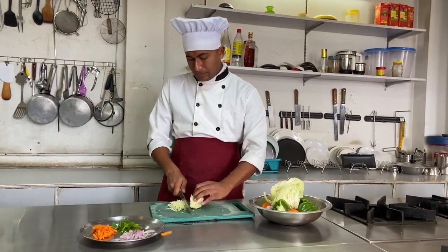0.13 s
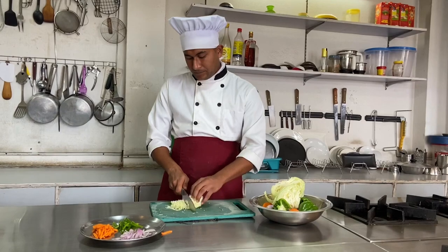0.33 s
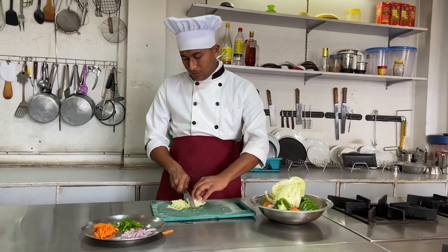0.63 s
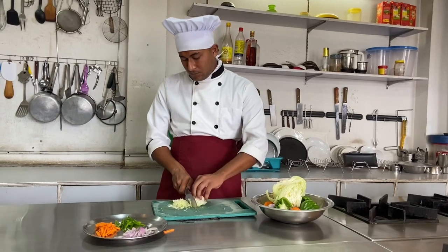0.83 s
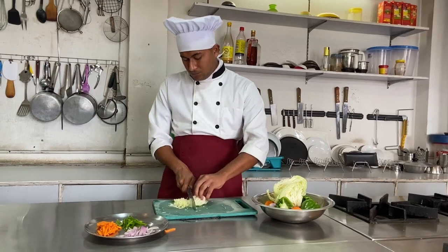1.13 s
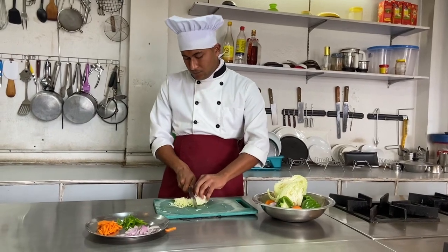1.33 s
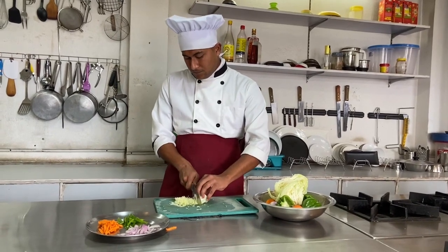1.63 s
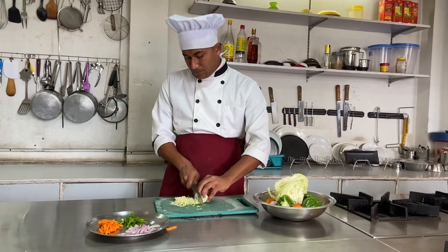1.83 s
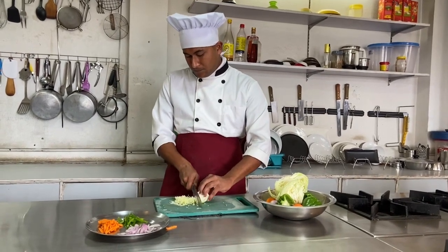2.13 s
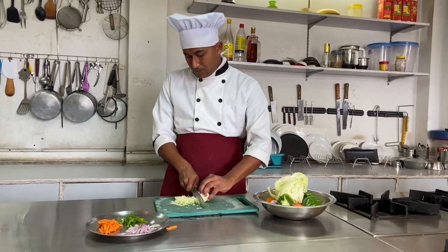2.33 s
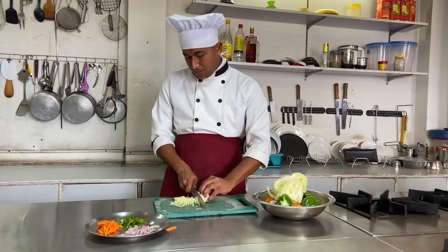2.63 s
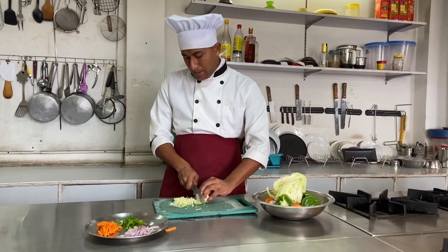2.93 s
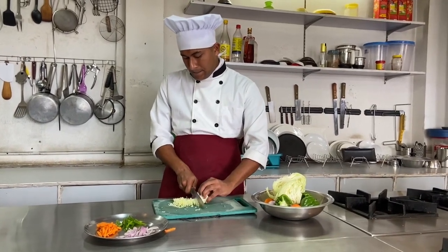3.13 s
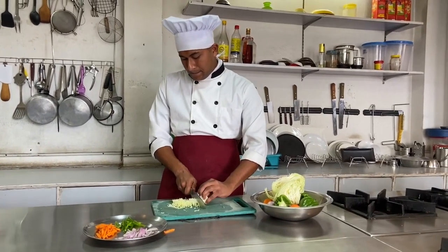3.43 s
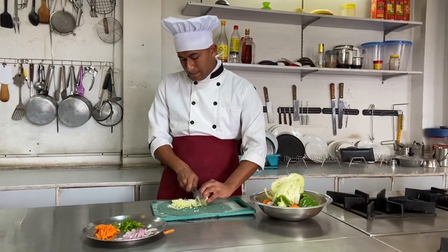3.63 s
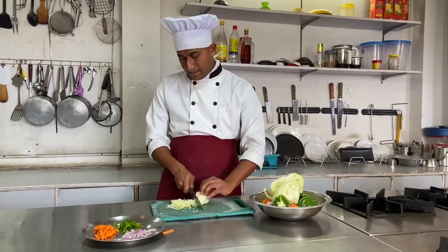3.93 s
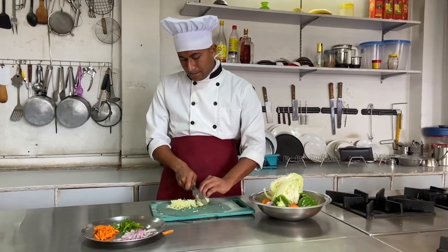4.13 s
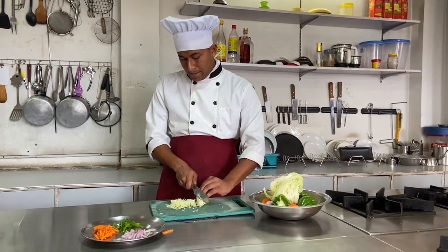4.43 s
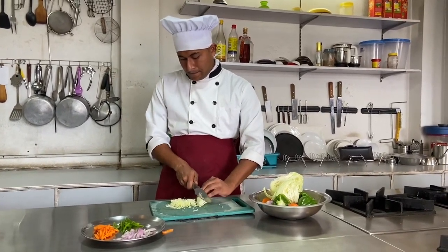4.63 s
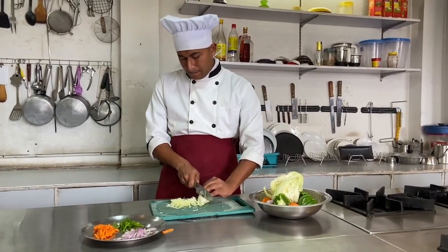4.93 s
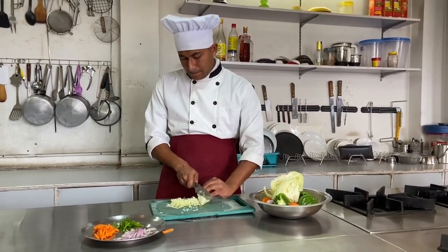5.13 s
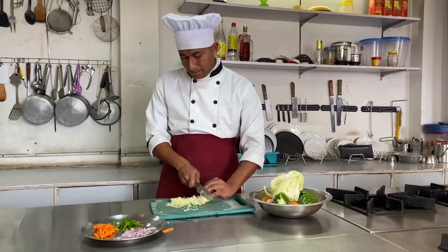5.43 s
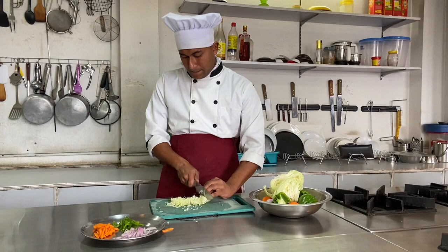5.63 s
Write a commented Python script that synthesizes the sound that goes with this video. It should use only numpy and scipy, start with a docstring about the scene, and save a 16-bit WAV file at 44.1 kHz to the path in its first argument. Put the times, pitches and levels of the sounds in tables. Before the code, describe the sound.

A low ventilation rumble with very faint hiss fills a hard, reflective kitchen. At the start the echo of an earlier knock dies away while a thin, fluttering squeak sounds until about 0.4 s, followed by a barely audible sagging whistle until 1.1 s. A soft, dull bump comes at 1.1 s. From 1.34 to 3.7 s a knife chops cabbage in a slightly uneven run, about every 0.2 to 0.3 s: each stroke swells with a crisp crackling crunch, then knocks short and hard on a plastic board, with an edge click, bright room echo and faint steel counter ring. The stroke near 1.94 s only crunches. The strongest blows overload the close microphone. Leaves rustle faintly in the pause, with a tiny blade tap at 4.2 s. Softer chops resume at 4.76 and 5.07 s, strengthening at 5.32 and 5.55 s; a final weak crunch at 5.8 s lacks a knock.

```python
"""The echo of an earlier knock dies away over the room's rumble while something squeaks faintly, then whistles.
A chef's knife then chops cabbage on a plastic board on a steel counter in a hard-walled kitchen.
Each stroke crunches (bursts of filtered clicks); most then knock on the board (decaying modes, crack, edge click).
Shreds rustle between strokes (sparse clicks and noise); the hardest knocks overload the microphone."""
import sys
import numpy as np
from scipy import signal
from scipy.fft import rfft, irfft, next_fast_len
from scipy.io import wavfile
from scipy.ndimage import map_coordinates

SR = 44100
rng = np.random.default_rng(int(sys.argv[2]) if len(sys.argv) > 2 else 0)


def pcm_store(signal):
    """Save signal as 16-bit PCM."""
    levels = np.round(np.clip(np.atleast_2d(signal), -1, 1) * 32767)
    wavfile.write(sys.argv[1], SR, levels.astype(np.int16).T)


N = 254898


def amp(db):
    """Decibels to gain."""
    return 10 ** (np.asarray(db) / 20)


def unit(x):
    """Scale to rms 1."""
    return x / np.sqrt(np.mean(x ** 2) + 1e-20)


def wobble(size, rate_hz):
    """A smooth random curve with rate_hz knots a second."""
    knots = rng.standard_normal(int(size * rate_hz / SR) + 4)
    return map_coordinates(knots, [np.arange(size) * rate_hz / SR])


def along(points, hz):
    """(Hz, value) points read on a log frequency axis."""
    point_hz, value = np.transpose(points)
    return np.interp(np.log(hz + 1), np.log(point_hz + 1), value)


def filtered(x, response):
    """x times a response of frequency, zero-padded against wrap-around."""
    size = next_fast_len(len(x) + 8192)
    hz = np.fft.rfftfreq(size, 1 / SR)
    return irfft(rfft(x, size) * response(hz), size)[:len(x)]


def coloured(x, spectrum):
    """x shaped by (Hz, dB) points."""
    return filtered(x, lambda hz: amp(along(spectrum, hz)))


def add(track, start_s, x):
    """Mix x into the track from start_s on, cropped to the track."""
    i = round(start_s * SR)
    x = x[max(-i, 0):max(N - i, 0)]
    track[max(i, 0):][:len(x)] += x


def grains(size, per_s, spread_db):
    """Random clicks of uneven strength, rms about 1."""
    hit = rng.random(size) < per_s / SR
    strength = rng.standard_normal(size) * amp(spread_db * rng.standard_normal(size))
    return unit(hit * strength)


# Echo colour. Each row: frequency in Hz, gain in dB.
ECHO_SPECTRUM = [(60, -12), (220, 7.5), (450, 1), (800, -7.5), (1150, -2.5), (1500, -1), (2400, 2),
                 (3400, -3.5), (4200, -6), (8000, -7), (16000, -8.5)]
# Echo decay. Each row: frequency in Hz, time to fall 60 dB in seconds.
ECHO_T60 = [(100, 1), (300, 0.78), (800, 0.74), (2000, 0.61), (3500, 0.46), (6000, 0.77), (14000, 0.45)]


def in_kitchen(x, wet_db, build_s=0.0059, early_db=3, early_s=0.021):
    """x with a diffuse noise tail that is strongest while the close walls answer."""
    hz, frame_s, noise = signal.stft(rng.standard_normal(SR), SR, nperseg=256)
    decay = amp(-60 * frame_s / along(ECHO_T60, hz)[:, None])
    tail = signal.istft(noise * decay, SR, nperseg=256)[1][:SR]
    tail = coloured(tail / np.linalg.norm(tail), ECHO_SPECTRUM)
    t = np.arange(SR) / SR
    tail *= (1 - np.exp(-(t / build_s) ** 2)) * amp(early_db * np.exp(-t / early_s))
    return np.pad(x, (0, SR - 1)) + amp(wet_db) * signal.fftconvolve(x, tail)


# Ventilation rumble. Each row: frequency in Hz, relative density in dB per Hz.
RUMBLE_SPECTRUM = [(20, -0.5), (40, -11.5), (60, -9.5), (90, -12.5), (125, -21), (220, -23.5), (350, -30.5),
                   (800, -29.5), (1500, -36.5), (2300, -43), (3500, -49), (4000, -59.5), (8000, -65),
                   (16000, -70)]


def room_air(rumble_db=-39.5, hiss_db=-72):
    """Ventilation rumble with a faint narrow hiss on top, both shaped noise."""
    rumble = unit(coloured(rng.standard_normal(N), RUMBLE_SPECTRUM))
    hiss_spectrum = [(2400, -60), (3250, -10), (3460, 0), (3620, -10), (4100, -60)]
    hiss = unit(coloured(rng.standard_normal(N), hiss_spectrum))
    return amp(rumble_db) * rumble + amp(hiss_db) * hiss


# Squeak partials. Each row: multiple of the pitch, relative level in dB.
PARTIALS = [(7, -9), (8, -1.5), (9, -4), (10, 0.5), (11, -13), (12, -15), (23, -17), (24, -21)]


def squeak(jitter=0.0069, flutter_db=3, width_hz=460, skirt_db=-12):
    """A thin squeal: partials flutter separately under a falling resonance, mostly heard through the room."""
    pitch_hz, arch_hz, ring_start_hz, ring_fall_hz_per_s = 351, 2.98, 3380, 530
    attack_s, hold_s, release_s = 0.028, 0.404, 0.014
    level_db, fade_db_per_s = -50.5, 11.5
    t = np.arange(N) / SR
    pitch = pitch_hz + arch_hz * np.sin(np.pi * np.minimum(t / hold_s, 1))
    ring_hz = ring_start_hz - ring_fall_hz_per_s * t
    gate = (1 - np.exp(-t / attack_s)) * np.exp(-np.maximum(t - hold_s, 0) / release_s)
    phase = 2 * np.pi * np.cumsum(pitch * (1 + jitter * wobble(N, rate_hz=90))) / SR
    tone = np.zeros(N)
    for multiple, partial_db in PARTIALS:
        resonance = amp(skirt_db) + np.exp(-((multiple * pitch - ring_hz) / width_hz) ** 2)
        flutter = amp(partial_db + flutter_db * wobble(N, rate_hz=18.6))
        tone += resonance * flutter * np.sin(multiple * phase)
    return in_kitchen(tone * amp(level_db - fade_db_per_s * t) * gate, wet_db=5)[:N]


def whistle(start_s=0.45, end_s=1.1, start_hz=3440, sag_hz_per_s=110, level_db=-70.5, jitter=0.0049):
    """One faint wavering sine that lingers after the squeak and sags in pitch."""
    t = np.arange(round((end_s - start_s) * SR)) / SR
    pitch = (start_hz - sag_hz_per_s * t) * (1 + jitter * wobble(len(t), rate_hz=90))
    tone = np.sin(2 * np.pi * np.cumsum(pitch) / SR) * signal.windows.tukey(len(t))
    track = np.zeros(N)
    add(track, start_s, in_kitchen(amp(level_db) * tone, wet_db=5.5))
    return track


# Single shreds snap. Each row: start in seconds, level in dB.
SNAPS = [(.441, -53), (.958, -60), (1.263, -57), (1.828, -56), (2.2145, -55), (5.228, -59), (5.659, -58)]
# Fingers shift the cabbage. Each row: centre in seconds, length in seconds, level in dB.
FINGER_MOVES = [(.13, 0.215, -63), (1.29, .038, -59), (2.842, .14, -62.5), (3.873, 0.078, -63),
                (4.46, .089, -70), (5.702, .055, -54.5)]


def shreds(tap_s=4.199, tap_db=-34, tap_hz=2900, tap_t60_s=0.0057, snap_t60_s=0.013, stray_db=-87, hold_db=-84):
    """Loose leaves rustle as grains under the fingers, single ones snap as noise, the blade is tapped once."""
    track = np.zeros(N)
    t = np.arange(SR // 40) / SR
    for start_s, db in SNAPS:
        add(track, start_s, amp(db - 60 * t / snap_t60_s) * rng.standard_normal(len(t)))
    add(track, tap_s, amp(tap_db - 60 * t / tap_t60_s) * np.sin(2 * np.pi * tap_hz * t))
    snap = amp(-60 * t / snap_t60_s) * rng.standard_normal(len(t))
    stray = signal.fftconvolve(grains(N, per_s=9, spread_db=1), snap)[:N]
    track += amp(stray_db) * unit(stray)
    t = np.arange(N) / SR
    # the leaves never lie quite still under the hand
    touch = amp(hold_db)
    for centre_s, length_s, db in FINGER_MOVES:
        touch = touch + amp(db) * np.exp(-(2 * (t - centre_s) / length_s) ** 2)
    rustle_spectrum = [(500, -6), (3000, 12.5), (4500, -2), (11000, -9), (16000, -14)]
    track += touch * unit(coloured(grains(N, per_s=3100, spread_db=4), rustle_spectrum))
    return in_kitchen(track, wet_db=-3)[:N]


# Cabbage and hand bump the board. Each row: start in seconds, level in dB.
SOFT_BUMPS = [(-.02, -28.5), (1.1048, -27), (1.14, -37), (1.174, -44.5), (1.251, -45)]
# Bump shudder. Each row: frequency in Hz, relative density in dB per Hz.
SHUDDER_SPECTRUM = [(40, -6), (130, -5), (280, -5.5), (480, 3), (800, 3.5), (1300, -11.5), (3000, -19.5),
                    (5000, -44)]


def bumping(t60_s=0.083, shove_db=4, shudder_db=-2.5):
    """Soft contacts give one dull shove and a low noise shudder with no ring."""
    track = np.zeros(N)
    t = np.arange(SR // 8) / SR
    u = t / 0.00043
    shove = -amp(shove_db) * u * (2 - u) * np.exp(1 - u)
    envelope = (1 - np.exp(-t / 0.00048)) * amp(shudder_db - 60 * t / t60_s)
    for start_s, db in SOFT_BUMPS:
        shudder = unit(coloured(rng.standard_normal(len(t)), SHUDDER_SPECTRUM)) * envelope
        add(track, start_s, in_kitchen(amp(db) * (shove + shudder), wet_db=0.5))
    return track


# Knife strokes, also played by chopping(). Each row: time the blade is down in seconds,
# length of the cut in seconds, force in dB, crunch level at the end of the cut in dB.
KNIFE_STROKES = [(1.104, 0.0529, -43, -53), (1.3434, .036, -7, -46), (1.5425, .052, -8, -44.5),
                 (1.7361, 0.0426, -1.1, -43.5), (1.944, 0.0519, -24, -49.5), (2.1004, 0.0191, -1.5, -49.5),
                 (2.3931, 0.044, 1.5, -43), (2.6713, 0.048, -2, -45), (2.8941, 0.017, 2.5, -48.5),
                 (3.1902, 0.07, -3, -49), (3.4665, 0.065, -4.5, -49), (3.707, .052, 1.5, -51.5),
                 (4.7579, 0.06, -11, -47.5), (5.0699, .066, -12.5, -46.5), (5.3179, 0.054, -8, -46.5),
                 (5.5497, .042, -2.5, -44.5), (5.793, 0.0432, -30, -53.5)]
# Bursting cells. Each row: frequency in Hz, relative density in dB per Hz.
CRACKLE_SPECTRUM = [(300, -19), (1200, -9), (2800, 14), (3500, 8.5), (4200, 0.5), (6000, -2), (9500, -5),
                    (14000, -12.5), (16000, -30)]
# Shaken board. Each row: frequency in Hz, relative density in dB per Hz.
GRUMBLE_SPECTRUM = [(60, -1.5), (200, -2.5), (450, 1.5), (750, 4.5), (1050, -2), (1400, -6), (2200, -10),
                    (3400, -17), (4500, -42)]


def slicing(push_db=3, release_s=0.014, layers_db=2, bite_s=0.0026):
    """Cells burst harder as the blade sinks in, leaf after leaf; the growing push shakes the board."""
    # at a force of 0 dB, then growth per dB of force
    swell_db, swell_db_per_db = 16, 0.41
    grumble_over_crunch_db, grumble_db_per_db = 13.5, 0.097
    track = np.zeros(N)
    for down_s, cut_s, force_db, crunch_db in KNIFE_STROKES:
        t = np.arange(round((cut_s + 0.12) * SR)) / SR
        uncut = np.maximum(1 - t / cut_s, 0)
        level_db = crunch_db - (swell_db + swell_db_per_db * force_db) * uncut
        gate = (1 - np.exp(-t / bite_s)) * np.exp(-np.maximum(t - cut_s, 0) / release_s)
        crackle = unit(coloured(grains(len(t), per_s=5000, spread_db=4), CRACKLE_SPECTRUM))
        grumble = unit(coloured(grains(len(t), per_s=6000, spread_db=0), GRUMBLE_SPECTRUM))
        crackle *= amp(level_db + layers_db * wobble(len(t), rate_hz=81))
        grumble_db = level_db + grumble_over_crunch_db + grumble_db_per_db * force_db
        grumble *= amp(grumble_db - push_db * uncut)
        add(track, down_s - cut_s, in_kitchen(gate * (crackle + grumble), wet_db=-1.5))
    return track


# Damped board under the blade. Each row: frequency in Hz, relative level in dB, time to fall 60 dB in seconds.
BOARD_MODES = [(189, -39.5, 0.0067), (670, -10, 0.0067), (798.4, 8, 0.0075), (1014, -12.5, 0.0097),
               (1860, -19, 0.011)]
# Steel counter. Each row: mean frequency in Hz, mean relative level in dB, time to fall 60 dB in seconds.
COUNTER_MODES = [(85.74, -36, 1), (184.3, -35, 1), (256.4, -35.5, 0.63), (338, -40, 0.23), (457, -39, 0.66),
                 (507.9, -33.5, 0.35), (656, -10.5, 0.11), (796, -18.5, 0.19), (1047, -28, 0.13)]
# Near surfaces. Each row: delay in seconds, gain in dB.
NEAR_REFLECTIONS = [(.0048, -14), (.0058, -22), (.0079, -14), (.0116, -19), (.0133, -17)]
# Crack of bare plastic. Each row: frequency in Hz, relative density in dB per Hz.
CRACK_SPECTRUM = [(600, -17), (1300, 10), (1900, 8), (2600, 1), (3500, -1.5), (4400, -27.5), (9000, -37)]


def knock(force_db, contact_s=0.0007, ring_db=-4, wet_db=-2, crack_db=1, crack_wet_db=2, sharpening=0.78):
    """One blow: the board's short thud and crack, its near reflections, the counter's ring and the room."""
    t = np.arange(SR * 3 // 4) / SR
    modes = sum(amp(db - 60 * t / t60_s) * np.sin(2 * np.pi * hz * t) for hz, db, t60_s in BOARD_MODES)
    thud = -(1 - np.exp(-t / contact_s)) * modes
    # leaves cushion the weak blows; hard ones meet bare plastic and crack
    impulse = signal.unit_impulse(len(t), SR // 1000)
    crack = amp(crack_db + sharpening * force_db) * coloured(impulse, CRACK_SPECTRUM)
    sound = in_kitchen(thud, wet_db) + in_kitchen(crack, crack_wet_db)
    for delay_s, db in NEAR_REFLECTIONS:
        sound[:len(t)] += amp(db) * np.interp(t - delay_s, t, thud, left=0)
    # the counter rings on after each blow, its modes drawn slightly differently in pitch and level
    for hz, db, t60_s in COUNTER_MODES:
        phase = 2 * np.pi * (hz * (1 + rng.normal(0, 0.00922)) * t + rng.random())
        decay = amp(ring_db + db + rng.normal(0, 2.19) - 60 * t / t60_s)
        sound[:len(t)] += decay * np.sin(phase) * (1 - np.exp(-t / 0.0013))
    return amp(force_db) * sound


# Click of the steel edge. Each row: frequency in Hz, relative density in dB per Hz.
CLICK_SPECTRUM = [(800, 17.5), (2000, 20), (3500, 7), (5300, 1.5), (7500, -13), (11000, -10.5),
                  (16000, -25.5)]


def chopping(click_s=0.0021, reach_db=-20, edge_db=-26.5, edge_db_per_db=1.9, edge_top_db=-22.5):
    """Strokes above reach_db knock and click on the board; weaker ones stop in the leaves."""
    track = np.zeros(N)
    t = np.arange(SR // 40) / SR
    # an earlier blow whose echo is still dying
    add(track, -0.07, knock(force_db=-1))
    for down_s, _, force_db, _ in KNIFE_STROKES:
        if force_db > reach_db:
            click = coloured(rng.standard_normal(len(t)), CLICK_SPECTRUM) * np.exp(-(t / click_s) ** 2)
            add(track, down_s, knock(force_db))
            add(track, down_s, click * amp(min(edge_db + edge_db_per_db * force_db, edge_top_db)))
    return track


def scene():
    """Everything at the microphone."""
    background = room_air() + squeak() + whistle()
    cabbage = shreds() + bumping() + slicing()
    return (background + cabbage + chopping())[None]


def record(dry):
    """The microphone flattens the hardest peaks and keeps nothing outside its band."""
    ceiling, hardness = 0.69, 10
    low_hz, top_hz = 12, 16000
    x = dry[0] / (1 + np.abs(dry[0] / ceiling) ** hardness) ** (1 / hardness)
    return filtered(x, lambda hz: (hz > low_hz) & (hz < top_hz))[None]


dry = scene()
out = record(dry)
pcm_store(out)
```